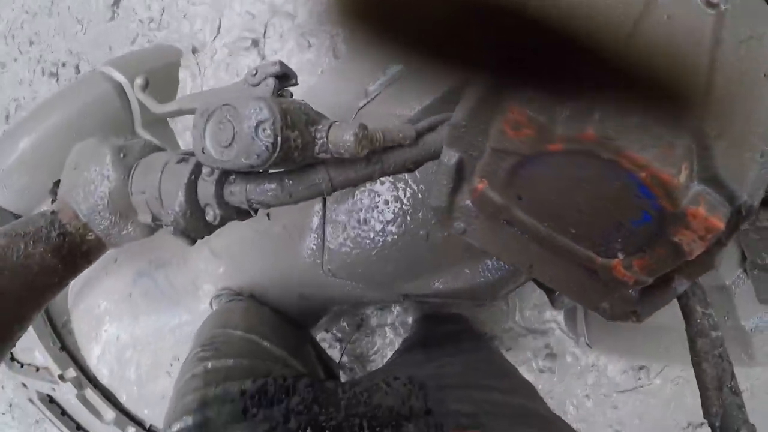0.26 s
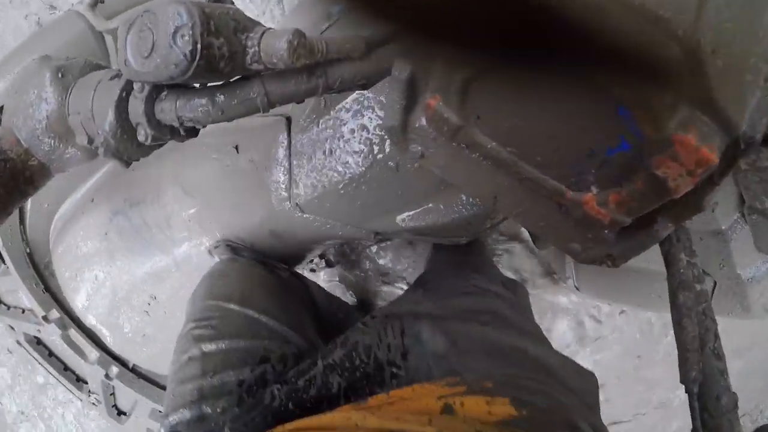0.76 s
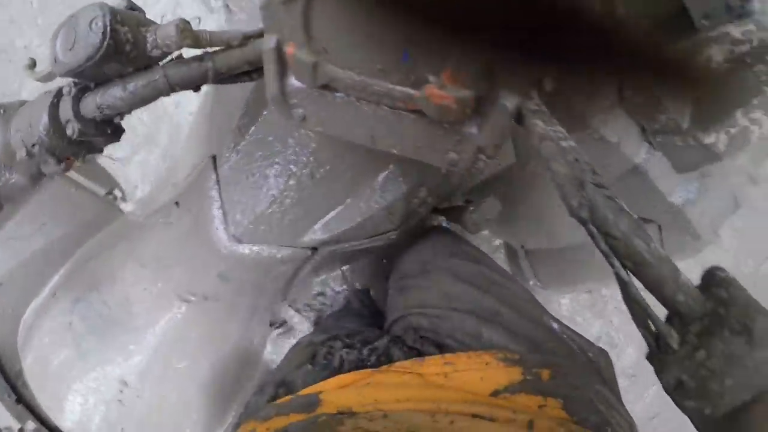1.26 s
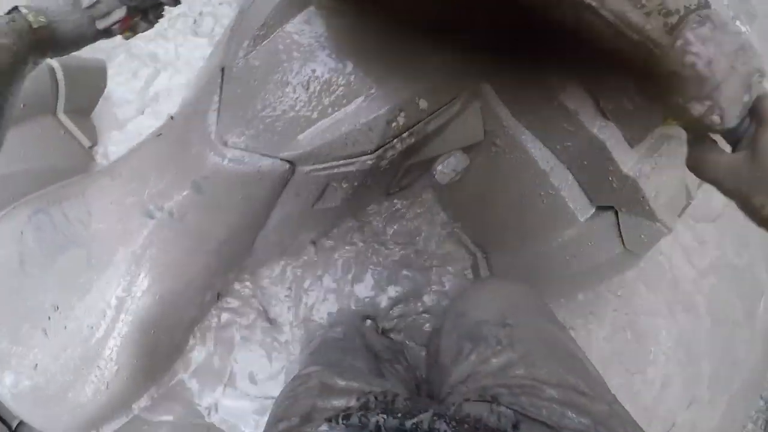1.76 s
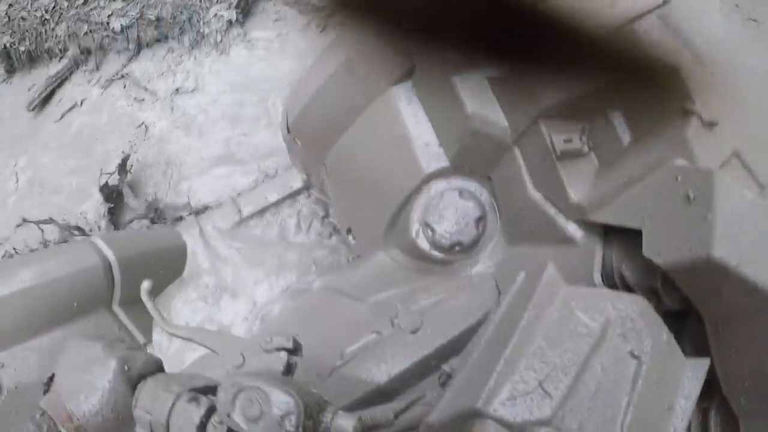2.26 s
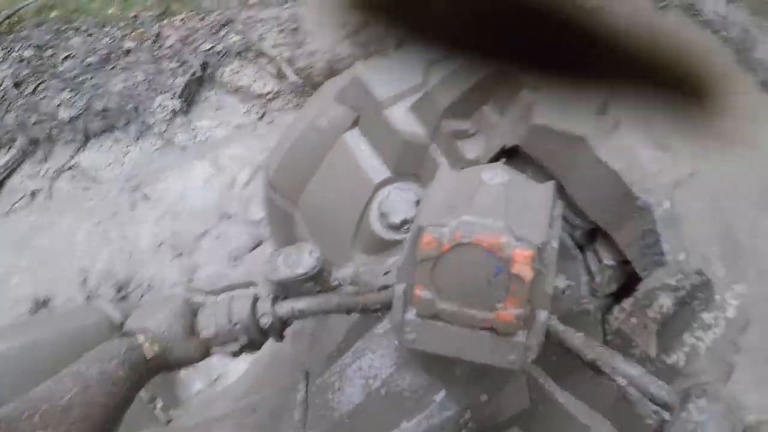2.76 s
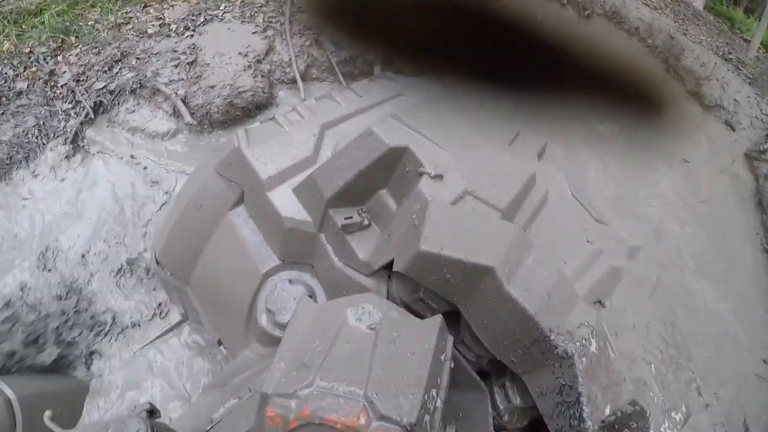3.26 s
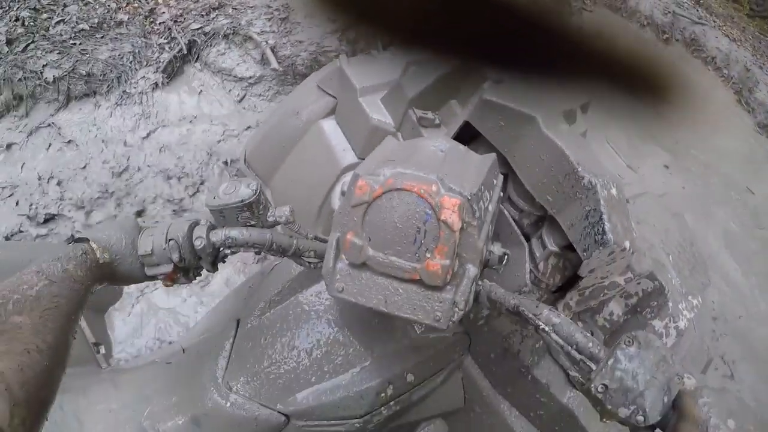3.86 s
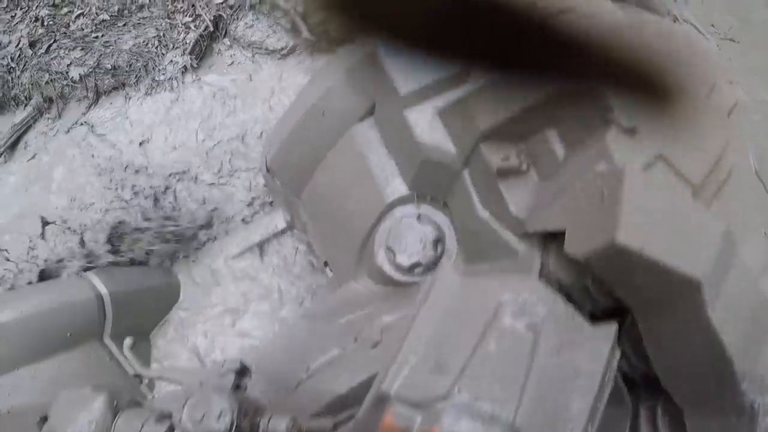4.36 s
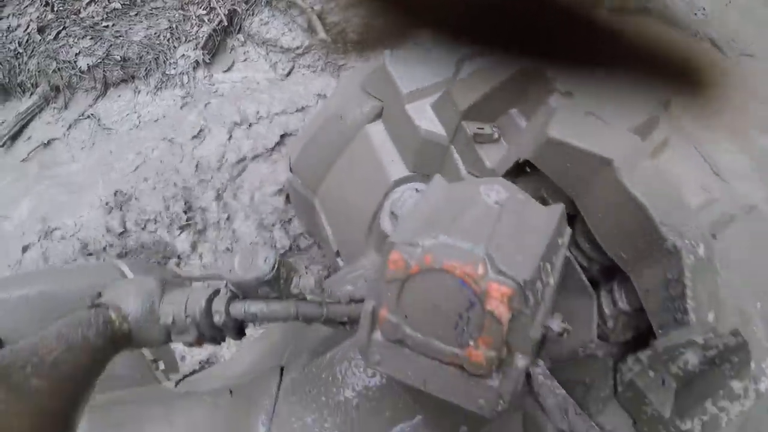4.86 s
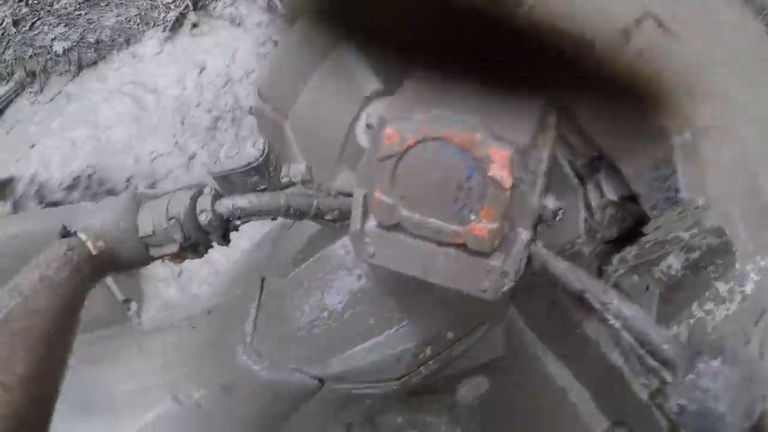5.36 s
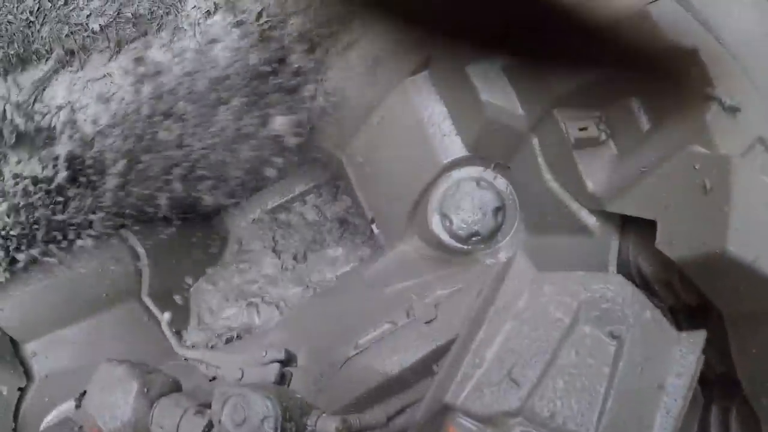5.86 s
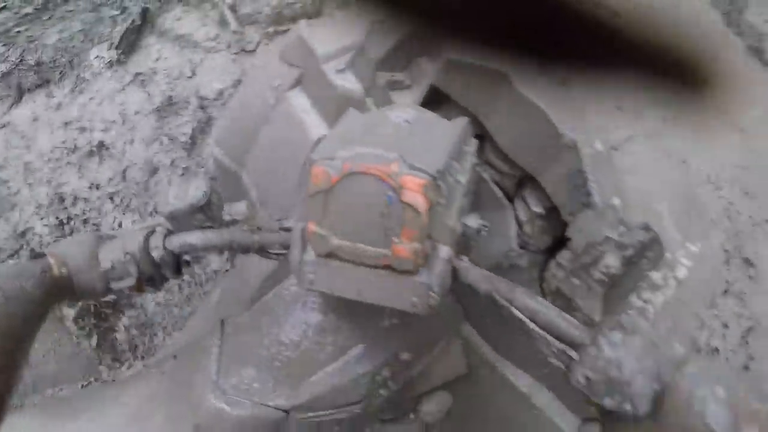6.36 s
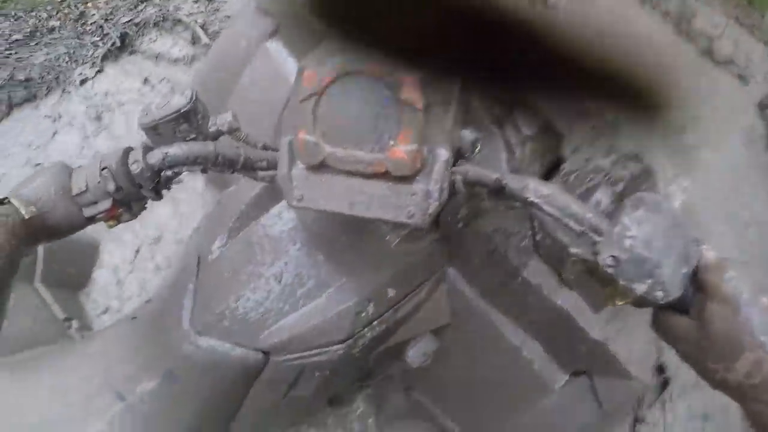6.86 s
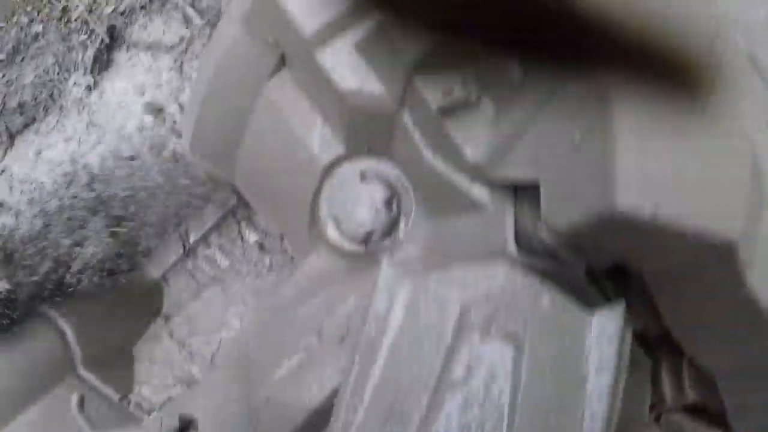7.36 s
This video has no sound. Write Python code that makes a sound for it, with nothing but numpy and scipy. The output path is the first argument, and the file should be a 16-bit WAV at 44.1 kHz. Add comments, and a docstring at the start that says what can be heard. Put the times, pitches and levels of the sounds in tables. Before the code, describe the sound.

Close up, a lumpy twin-cylinder engine glugs and sloshes in thick muddy water before five honking throttle blasts, each followed by spattering mud.

```python
"""Quad bike stuck in a mud hole

A V-twin ATV idles deep in mud, heard from the rider's helmet, then gets five bursts of throttle.
Harmonics and firing pulses follow one crank speed: they drive the pipe's throb, the drowned exhaust,
the drumming bodywork and the intake's honk. Filtered noise and random impacts make sloshing water,
and mud that comes down heaviest after each burst. Glugs, plops, knocks and ticks are placed singly."""
import sys
import numpy as np
from scipy import signal
from scipy.fft import rfft, irfft
from scipy.io import wavfile
from scipy.ndimage import uniform_filter1d, minimum_filter1d

SR = 44100
rng = np.random.default_rng(int(sys.argv[2]) if len(sys.argv) > 2 else 0)


def transcribe(signal):
    """Save signal, clipped to [-1, 1], as a 16-bit WAV file at the path in sys.argv[1]."""
    frames = np.atleast_2d(signal).T
    limited = np.clip(frames, -1, 1)
    pcm = np.round(limited * 32767).astype(np.int16)
    wavfile.write(sys.argv[1], SR, pcm)


N = 336042
TIME = np.arange(N) / SR

# Bursts of throttle. Each row: half open on the way up in seconds, half shut in seconds, starting rpm,
# run-up in rpm per second, top rpm under that load, honk in dB at HONK_RPM,
# amount of thrown mud in dB, delay from shutting to the mud's peak in seconds.
BURSTS = [ (1.70, 2.101, 1573, 6420, 7180, -11, -44, 0.96),
          (2.703, 3.201, 1845, 6660, 7164, -10.5, -37, .52),
          (3.807, 4.247, 1816, 6810, 5957, -9, -37.5, .59),
          (4.939, 5.617, 1959, 7635, 5926, -10.5, -35, 0.78),
          (6.575, 7.361, 1789, 7148, 6190, -11.5, -41, 0.54), ]
# Idle that sags, then creeps up before the first burst. Each row: time in seconds, speed in rpm.
IDLE_SPEED = [(0, 1206), (.4, 1171), (1.17, 1239), (1.58, 1294), (1.70, 1510)]
# Harmonics of the engine's note. Each row: multiple of the cycle rate, level in dB.
NOTE_HARMONICS = [(1, -1), (2, 5), (3, 9.5), (4, 3.5), (5, -4.5), (6, 5.5), (7, 3), (8, 1.5), (9, 3),
                  (10, 1.5), (11, 2.5), (12, 3), (13, -1.5), (14, 6.5), (15, 0.5), (30, -2), (48, -5.5)]
# Harmonics of the pipe's throb. Each row: multiple of the cycle rate, level in dB.
THROB_HARMONICS = [(1, -9.5), (2, -2), (3, -13.5)]
# Tailpipe under water. Each row: frequency in Hz, response in dB.
TAILPIPE_RESPONSE = [(20, -2.5), (55, -8), (80, 0.5), (100, 5), (125, -7.5), (200, -16.5), (400, -51),
                     (1000, -103.5)]
# Air gurgling in the flooded bodywork. Each row: time in seconds, level in dB before the pipe clears.
GURGLE_LEVEL = [(0, -25.5), (1.1, -18.5), (1.4, -14.5), (2.0, -11), (2.4, -89)]
# Colour of that gurgle. Each row: frequency in Hz, response in dB.
GURGLE_RESPONSE = [(60, -10.5), (103, 12.5), (135, -10), (180, 8.5), (220, -1), (280, -25.5), (500, -46),
                   (1000, -85.5)]
# Engine case and bodywork. Each row: frequency in Hz, response in dB.
BODY_RESPONSE = [(40, -12), (110, -7), (165, 0), (215, -2.5), (270, -6), (420, -7.5), (520, -15.5),
                 (630, -26.5), (800, -34.5), (1050, -42.5), (2000, -38.5), (5000, -107)]
# Trim on the rumble, lowest in and after the first burst. Each row: time in seconds, added level in dB.
RUMBLE_TRIM = [(1.45, -5.5), (1.7, -4.5), (2.25, -13), (2.52, -13), (2.7, -8.5), (3.3, -6), (4.6, -7),
               (6.2, -6), (7.5, -8)]
# Water round the engine. Each row: time in seconds, slop in dB, brighter splash in dB.
WASH_LEVELS = [(0, -31.5, -39), (.3, -29.5, -45), (.52, -30, -44), (.7, -27.5, -43), (1.05, -28, -38.5),
               (1.28, -31, -42), (1.5, -32.5, -46.5), (2.4, -45, -56.5), (4, -67, -95)]
# Colour of the slop. Each row: frequency in Hz, response in dB.
SLOP_RESPONSE = [(250, 18.5), (600, 14.5), (800, 11), (1080, 2.5), (1400, 4), (1700, -4.5), (2000, -6),
                 (2600, -8.5), (3400, -6), (4300, -18.5), (6000, -30.5), (8000, -23), (11000, -34)]
# Colour of the splash. Each row: frequency in Hz, response in dB.
SPLASH_RESPONSE = [(500, -19.5), (1000, -8.5), (1450, 11), (1750, 0.5), (2050, 0.5), (2600, 1), (3400, -1),
                   (4400, -15.5), (7000, -25), (12000, -38.5)]
# Rings of the engine case. Each row: frequency in Hz, width in Hz, height in dB.
CASE_RINGS = [(1933, 29, 11), (1880, 18, 5.7)]
# Fizz of stirred water. Each row: time in seconds, level in dB.
FIZZ_LEVEL = [(0, -65), (1.4, -67), (1.72, -53.5), (2.02, -67.5), (2.11, -79), (2.15, -56.5), (2.7, -76.5),
              (3.2, -100)]
# Colour of the fizz. Each row: frequency in Hz, response in dB.
FIZZ_RESPONSE = [(3000, -29.5), (6000, -5), (7700, -5), (9000, -11), (12000, -29.5)]
# Mud hitting the fenders. Each row: frequency in Hz, response in dB.
PATTER_RESPONSE = [(60, 1.5), (200, 19.5), (420, 22), (650, 16.5), (1050, -6.5), (1300, 4.5), (1550, 7),
                   (2100, 4.5), (2450, 4.5), (3450, -9.5), (4300, -8), (5200, -10.5), (6400, -13),
                   (8000, -16.5), (9800, -23), (11200, -30.5), (15000, -45.5)]
# Fender rings and hollows. Each row: frequency in Hz, width in Hz, height in dB.
FENDER_MODES = [(1512, 45, 8), (1716, 140, -26.5), (2067, 230, -22), (3476, 340, 14), (3716, 150, -14.5),
                (4250, 220, 6), (4600, 270, -3.5), (5140, 170, 7), (5790, 480, -2), (6320, 270, 5.5),
                (6550, 300, 0.5)]
# Colour of the mist. Each row: frequency in Hz, response in dB.
MIST_RESPONSE = [(3000, -35), (8000, -10.5), (9800, -12.5), (11200, -16), (12300, -1.5), (14500, 0.5),
                 (15500, -12.5)]
# Plops and splats. Each row: start in seconds, peak in dB, pitch in Hz, splat relative to the bubble's ring.
PLOP_EVENTS = [(.1186, -34, 3550, 0.35), (0.527, -24, 1570, 3), (.82, -21.5, 1400, 0.14),
               (0.821, -27, 3210, 0.54), (.884, -28, 2620, 2.1), (0.893, -31, 2980, 3),
               (0.901, -31, 2720, 3), (1.6449, -17.5, 3340, 0.26), (3.1139, -40, 1675, 3.6),
               (3.5529, -33, 2302, 2.72), (4.3666, -30.5, 2777, 3), (4.8971, -30, 1600, 3.14)]
# Knocks of a hard part. Each row: start in seconds, peak in dB.
KNOCK_EVENTS = [(.1335, -18), (.138, -26), (.1405, -21), (.153, -13.5), (.1575, -27)]
# What that part rings with. Each row: frequency in Hz, decay in seconds, relative level in dB.
KNOCK_RINGS = [(1150, 0.0018, -3), (1350, 0.0025, 14), (1950, .0016, -5), (3530, .001, -20)]
# Big air pockets from the tailpipe. Each row: start in seconds, peak in dB, mid pitch in Hz, length in seconds.
GLUG_EVENTS = [(0.146, -16, 101.2, 0.14), (.40, -12.5, 96.9, 0.19), (0.916, -11, 78.3, 0.11),
               (1.035, -13, 71, .1), (1.329, -11.5, 95.2, 0.097), (1.462, -14, 104, 0.056),
               (1.64, -12.5, 106, 0.13), (2.121, -10.5, 84.35, 0.088), (2.176, -13, 112, 0.078),
               (2.319, -18, 96.8, 0.15), (3.549, -11.5, 96.2, 0.15), (4.832, -18, 95.6, 0.084),
               (5.896, -13.5, 86.1, 0.16), (6.032, -14, 92.5, 0.14), (6.191, -11, 102.6, 0.086),
               (6.246, -15, 91, .09), (6.42, -17, 92, .1)]
# Sharp ticks. Each row: start in seconds, peak in dB, centre of the band in Hz.
TICK_EVENTS = [(1.646, -32, 4500), (2.451, -35, 3300), (2.808, -38, 5000), (3.554, -31, 4200),
               (4.368, -34, 4500), (5.227, -35, 1500), (5.408, -24, 1400), (5.497, -29, 1500)]
# Airbox and snorkel answering a gulp of air. Each row: frequency in Hz, response in dB.
AIRBOX_RESPONSE = [(15, -51), (35, -2.5), (70, -12.5), (100, -12.5), (143, -2), (172, -12.5), (205, 4.5),
                   (235, 5), (260, 1.5), (298, -16), (345, -5), (390, 2.5), (440, -3), (485, -19.5),
                   (540, -17), (680, -48.5), (1100, -55), (2500, -93.5)]
# Opening out to both sides. Each row: time in seconds, gain of the side signal in dB.
SIDE_LEVEL = [(1.0, -32.5), (1.6, 8.5), (2.0, 10.5), (2.4, 4.5), (2.8, -10.5), (3.2, -40)]
# Colour of the side signal. Each row: frequency in Hz, response in dB.
SIDE_RESPONSE = [(40, -54), (200, -29), (420, -21), (1100, 6.5), (2000, -8.5), (3500, -19), (8000, -4.5)]

SECOND_FIRING = .395  # share of the cycle from the first cylinder's firing to the second's
OPEN_RAMP_S, SHUT_RAMP_S = 0.11, .06  # time the throttle takes to move
TOP_KNEE = 9  # sharpness of the levelling off towards the top speed
COAST_SHAPE = 1.8  # the crank runs down quickly at first
LAST_COAST_S, LAST_COAST_RPM = 1, 1706  # the last coast heads for this speed over this time
NOTE_WAVER_DB = 2  # the balance of the harmonics keeps shifting
# throb levels well below the fade speeds, with the throttle shut and open
THROB_SHUT_DB, THROB_SHUT_FADE_RPM = -14.5, 2430
THROB_OPEN_DB, THROB_OPEN_FADE_RPM = -13, 4600
CLEAR_RPM = 3800  # at this speed the open throttle halves the burble, gurgle and rumble
# levels before that clearing; the bubbles come in uneven gushes
BURBLE_DB, BURBLE_SURGE_DB = -18.5, 5.5
PIPE_SWING_OCTAVES = .1  # shift of the tailpipe's pitch either way with its depth
RUMBLE_SHUT_DB, RUMBLE_OPEN_DB = -13.5, -2  # before the clearing and RUMBLE_TRIM
RUMBLE_BAND_HZ = 360  # the churning is scaled to match the engine's note within about this band
SPRAY_LEAD_S, SPRAY_FALL_S, SPRAY_SHAPE = 0.3, 0.53, 0.96  # mud starts to fly before the throttle shuts
DRIBBLE_DB = -49.5  # mud that always runs off the wheels
PATTER_DB = 5.5  # thud and patter on the fenders for a given amount of mud
MIST_DB, MIST_ONSET_DB, MIST_GROWTH = -72, -44, 1.2  # mist at that much mud; it grows faster than the mud
GLUG_SAG = 0.15  # fall over a whole glug, as a share of its mid pitch
TICK_DECAY_S = .0007
HONK_RPM, HONK_DB_PER_OCTAVE = 3000, 5  # the honk has its listed level at this speed and grows above it
HONK_ROUGH, HONK_CLEAN_RPM = 1.5, 2900  # turbulence relative to the tone at low revs; halved at this speed
TOP_HZ = 15300


def undb(db):
    """Decibels to gain."""
    return 10 ** (np.asarray(db) / 20)


def curve(rows, axis=1):
    """One column of a table, joined by straight lines in time."""
    rows = np.asarray(rows)
    return np.interp(TIME, rows[:, 0], rows[:, axis])


def steady(x, size=7001):
    """Hold the running rms near 1."""
    power = uniform_filter1d(uniform_filter1d(x * x, size), size)
    return x / np.sqrt(np.abs(power) + 1e-18)


def colour(x, points, size=16384):
    """Causal minimum-phase filter with the given (Hz, dB) response."""
    hz, db = np.transpose(points)
    grid = np.maximum(np.fft.rfftfreq(size, 1 / SR), 1)
    response_db = np.interp(np.log(grid), np.log(hz), db)
    # folding the cepstrum onto positive times makes the filter causal
    cepstrum = irfft(np.log(undb(response_db)))
    cepstrum[1:size // 2] *= 2
    cepstrum[size // 2 + 1:] = 0
    impulse = irfft(np.exp(rfft(cepstrum)))
    return signal.fftconvolve(x, impulse)[:N]


def resonate(x, modes):
    """Narrow peaks and dips, added one after another."""
    for hz, width, db in modes:
        band = signal.lfilter(*signal.iirpeak(hz, hz / width, fs=SR), x)
        x = x + (undb(db) - 1) * band
    return x


def band_noise(noise, order, low_hz, high_hz):
    """Noise kept between two frequencies."""
    return signal.sosfilt(signal.butter(order, [low_hz, high_hz], "band", fs=SR, output="sos"), noise)


def clicks(times, sizes):
    """Impulses, each shared between two samples."""
    at = np.clip(times * SR, 0, N - 2)
    i = at.astype(int)
    late = at - i
    return np.bincount(i, sizes * (1 - late), N) + np.bincount(i + 1, sizes * late, N)


def walk(rate):
    """Random wavering with a spread near 1, from this many points a second."""
    return np.interp(TIME * rate, np.arange(4096), rng.standard_normal(4096))


def drops(rate, spread_db):
    """Random impacts of either sign at this rate per second, their sizes scattered by spread_db."""
    hit = rng.random(N) < rate / SR
    sizes = undb(spread_db * np.minimum(rng.exponential(size=N), 6))
    x = hit * sizes * rng.choice([-1, 1], N)
    return x / np.std(x)


def ring(x, decay_s, size=8192):
    """A dense tail from many short reflections."""
    t = np.arange(size) / SR
    tail = rng.standard_normal(size) * np.exp(-t / decay_s)
    # even out its colour, so that it mostly just smears time
    response = rfft(tail, 2 * size)
    smear = irfft(response / np.abs(response))[:size]
    return signal.fftconvolve(x, smear)[:N]


def spread(mid, side, side_db):
    """Left and right from a common and an opposed part."""
    return mid + undb(side_db) * side * np.array([[1], [-1]])


def opening(opens, shuts):
    """Throttle during one burst, 0 to 1: ramp up, hold, snap shut."""
    rising = (TIME - opens) / OPEN_RAMP_S
    falling = (shuts - TIME) / SHUT_RAMP_S
    return np.clip(np.minimum(rising, falling) + .5, 0, 1)


def crank_speed():
    """Rpm: a drifting idle, then for each burst a run-up that levels off and a coast down."""
    rpm = curve(IDLE_SPEED)
    coast_ends = [(opens, start) for opens, _, start, *_ in BURSTS[1:]]
    coast_ends.append((BURSTS[-1][1] + LAST_COAST_S, LAST_COAST_RPM))
    for (opens, shuts, start, run_up, top, *_), (ends, low) in zip(BURSTS, coast_ends):
        free = start + run_up * np.clip(TIME - opens, 0, shuts - opens)
        driven = free / (1 + (free / top) ** TOP_KNEE) ** (1 / TOP_KNEE)
        coast = np.interp(TIME, [shuts, ends], [1, 0]) ** COAST_SHAPE
        rpm = np.where(TIME > opens, low + (driven - low) * coast, rpm)
    return rpm


def engine_note(cycles):
    """Wavering harmonics that glide with the crank, phased like two unevenly spaced gas pulses a cycle."""
    phase = cycles + .003 * walk(45)
    orders = np.arange(1, NOTE_HARMONICS[-1][0] + 1)
    levels = np.interp(orders, *np.transpose(NOTE_HARMONICS))
    shifts = np.angle(1 + .9 * np.exp(-2j * np.pi * orders * SECOND_FIRING))
    note = np.zeros(N)
    for order, db, shift in zip(orders, levels, shifts):
        strength = undb(db + NOTE_WAVER_DB * walk(7))
        note += strength * np.cos(2 * np.pi * order * phase + shift)
    return steady(note)


def firings(cycles, jitter_s, scatter_db):
    """Two unevenly spaced pulses for every two turns of the crank, scattered in time and strength."""
    chance = rng.standard_normal((1024, 2))
    count = np.arange(2 * int(cycles[-1]))
    times = np.interp(count // 2 + SECOND_FIRING * (count % 2), cycles, TIME)
    return clicks(times + jitter_s * chance[count, 0], undb(scatter_db * chance[count, 1]))


def puffs(pulses, decay_s):
    """A short gust of turbulence after each pulse."""
    gusts = signal.lfilter([1], [1, -np.exp(-1 / (decay_s * SR))], pulses)
    return steady(gusts * rng.standard_normal(N))


def throb(cycles, rpm, throttle):
    """The pipe throbs mainly once a crank turn: strong at idle and when pulling, fading as the speed rises."""
    phase = cycles + .02 * walk(28)
    wave = np.sqrt(2) * sum(undb(db) * np.sin(2 * np.pi * k * phase) for k, db in THROB_HARMONICS)
    coasting = undb(THROB_SHUT_DB) / (1 + (rpm / THROB_SHUT_FADE_RPM) ** 6)
    pulling = undb(THROB_OPEN_DB) / (1 + (rpm / THROB_OPEN_FADE_RPM) ** 6)
    return wave * ((1 - throttle) * coasting + throttle * pulling)


def exhaust(cycles):
    """Bubbles scattered round the firings burble in a pipe that dips and lifts, or gurgle in the bodywork."""
    pulses = firings(cycles, jitter_s=.003, scatter_db=2)
    bubbles = steady(ring(pulses, decay_s=.015)) + .6 * puffs(pulses, decay_s=.08)

    def pipe(octaves):
        """The bubbles through the tailpipe, its response shifted in pitch."""
        return colour(bubbles, [(hz * 2 ** octaves, db) for hz, db in TAILPIPE_RESPONSE])

    # blending a low and a high pipe stands for the changing depth
    depth = np.clip(.5 + .5 * walk(3.3), 0, 1)
    blend = depth * pipe(-PIPE_SWING_OCTAVES) + (1 - depth) * pipe(PIPE_SWING_OCTAVES)
    burble = steady(blend, size=2001) * undb(BURBLE_DB + BURBLE_SURGE_DB * walk(30))
    gurgle = steady(colour(bubbles, GURGLE_RESPONSE), size=2001) * undb(curve(GURGLE_LEVEL))
    return burble + gurgle


def rumble(cycles, throttle, note):
    """Engine note and churned water drum on case and bodywork: firm under load, ragged with throttle shut."""
    pulses = firings(cycles, jitter_s=.002, scatter_db=2)
    tone = ring(note, decay_s=.008) * (.6 + .4 * throttle)
    band_gain = np.sqrt(SR / 2 / RUMBLE_BAND_HZ)
    churn = puffs(pulses, decay_s=.09) * band_gain * (.7 - .45 * throttle)
    db = (1 - throttle) * RUMBLE_SHUT_DB + throttle * RUMBLE_OPEN_DB + curve(RUMBLE_TRIM)
    return steady(colour(tone + churn, BODY_RESPONSE), size=2001) * undb(db)


def wash():
    """Noise and impacts as water slopping round the idling engine, whose case rings; it fades in the bursts."""
    surge = undb(1.2 * walk(17.0) + 1.9 * walk(70))
    flow = drops(1800, spread_db=0.5) + 0.93 * rng.standard_normal(N)
    slop = steady(resonate(colour(flow, SLOP_RESPONSE), CASE_RINGS))
    splash = steady(resonate(colour(drops(2500, spread_db=1.5), SPLASH_RESPONSE), CASE_RINGS))
    # a thin fizz swells as the first burst stirs the water
    fizz = steady(colour(drops(2600, spread_db=3.5), FIZZ_RESPONSE))
    water = slop * undb(curve(WASH_LEVELS)) + splash * undb(curve(WASH_LEVELS, axis=2))
    return surge * (water + fizz * undb(curve(FIZZ_LEVEL)))


def thrown_mud():
    """Amount of mud coming down: each burst throws one fountain, which builds up and collapses."""
    power = undb(DRIBBLE_DB) ** 2
    for _, shuts, *_, db, lag in BURSTS:
        swell = np.interp(TIME - shuts, [-SPRAY_LEAD_S, lag, lag + SPRAY_FALL_S], [0, 1, 0])
        power = power + (undb(db) * swell ** SPRAY_SHAPE) ** 2
    return np.sqrt(power)


def spray():
    """Mud rains on the ringing fenders in uneven sheets, with a fine mist of impacts above it."""
    mud = thrown_mud()
    sheets = undb(1.0 * walk(22) + 0.91 * walk(90))
    impacts = drops(4000, spread_db=0.0) + .5 * rng.standard_normal(N)
    patter = steady(resonate(colour(impacts, PATTER_RESPONSE), FENDER_MODES))
    mist = [steady(colour(drops(5000, spread_db=-5.0), MIST_RESPONSE)) for _ in range(2)]
    # the mist is wide and leans to the right
    fine = spread(*mist, side_db=-3.5) * undb(MIST_DB + np.array([[-3], [3]]))
    mist_swell = (mud / undb(MIST_ONSET_DB)) ** MIST_GROWTH
    return sheets * (patter * mud * undb(PATTER_DB) + fine * mist_swell)


def plops(size=2048):
    """Thick bubbles burst: a few cycles rising slightly in pitch, and a wet splat of noise."""
    out, t = np.zeros(N + size), np.arange(size) / SR
    swell = t ** 2 * np.exp(-t / .0012)
    for s, db, hz, wet in PLOP_EVENTS:
        bubble = np.sin(2 * np.pi * hz * t * (1 + 2 * t))
        splat = band_noise(rng.standard_normal(size), 3, hz / 1.5, min(hz * 1.5, 4200))
        pop = (bubble + wet * splat / np.std(splat)) * swell
        start = int(s * SR)
        out[start:start + size] += undb(db) * pop / np.abs(pop).max()
    return out[:N]


def knocks(size=1024):
    """Short hard knocks, all on the same part ringing in a few damped modes."""
    t = np.arange(size) / SR
    blow = np.zeros(size)
    for hz, decay_s, db in KNOCK_RINGS:
        blow += undb(db) * np.exp(-t / decay_s) * np.sin(2 * np.pi * hz * t)
    times, db = np.transpose(KNOCK_EVENTS)
    return signal.fftconvolve(clicks(times, undb(db)), blow / np.abs(blow).max())[:N]


def glugs():
    """Each big air pocket swells, wobbles for a few cycles and dies away, sinking in pitch."""
    out, wobble = np.zeros(N), .13 * walk(45)
    for s, db, hz, length in GLUG_EVENTS:
        age = np.clip((TIME - s) / length, 0, 1)
        live = (age > 0) & (age < 1)
        age = age[live]
        turns = hz * length * (age + GLUG_SAG * age * (1 - age) / 2)
        wave = np.sin(2 * np.pi * (turns + wobble[live] + rng.random()))
        out[live] += undb(db) * np.sin(np.pi * age ** 0.85) * wave
    return out


def ticks(size=512):
    """Sharp dry ticks of decaying band noise."""
    out, t = np.zeros(N + size), np.arange(size) / SR
    for s, db, hz in TICK_EVENTS:
        burst = rng.standard_normal(size) * np.exp(-t / TICK_DECAY_S)
        tick = band_noise(burst, 2, hz / 1.7, hz * 1.7)
        start = int(s * SR)
        out[start:start + size] += undb(db) * tick / np.abs(tick).max()
    return out[:N]


def intake(cycles, rpm, note):
    """Under throttle, gulps of air ring the airbox and snorkel: ragged at low revs, clean and louder high up."""
    pulses = firings(cycles, jitter_s=.00006, scatter_db=1.0)
    rough = HONK_ROUGH / (1 + (rpm / HONK_CLEAN_RPM) ** 6)
    # the ducts draw each gulp out a little
    gulps = ring(note, decay_s=.003) + rough * puffs(pulses, decay_s=.035)
    honk = steady(colour(gulps, AIRBOX_RESPONSE), size=3001)
    effort = sum(opening(opens, shuts) * undb(db) for opens, shuts, _, _, _, db, *_ in BURSTS)
    return honk * effort * undb(HONK_DB_PER_OCTAVE * np.log2(rpm / HONK_RPM))


def scene():
    """All layers from one crank: the engine in the middle, and a mix that opens out briefly to both sides."""
    rpm = crank_speed()
    throttle = sum(opening(opens, shuts) for opens, shuts, *_ in BURSTS)
    cycles = np.cumsum(rpm / (2 * 60)) / SR  # one cycle is two crank turns
    note = engine_note(cycles)
    # under load the gas blows the pipe clear: bubbling and rumble thin out
    clear = 1 / (1 + throttle * (rpm / CLEAR_RPM) ** 3)
    drowned = clear * (exhaust(cycles) + rumble(cycles, throttle, note))
    engine = throb(cycles, rpm, throttle) + drowned + intake(cycles, rpm, note)
    sound = engine + wash() + spray() + plops() + knocks() + glugs() + ticks()
    side = colour(ring(sound.mean(axis=0), decay_s=0.00076), SIDE_RESPONSE)
    return spread(sound, side, curve(SIDE_LEVEL))


def record(dry):
    """Cut the lowest rumble, hold the peaks with a look-ahead limiter, then cut the top."""
    sound = signal.sosfilt(signal.butter(2, 12, "high", fs=SR, output="sos"), dry)
    ceiling = .94
    needed = ceiling / np.maximum(np.abs(sound).max(axis=0), ceiling)
    # the gain drops ahead of each peak and is smoothed twice
    held = minimum_filter1d(needed, size=881)
    gain = uniform_filter1d(uniform_filter1d(held, size=441), size=441)
    return signal.sosfilt(signal.ellip(8, .2, 70, TOP_HZ, fs=SR, output="sos"), sound * gain)


dry = scene()
out = record(dry)
transcribe(out)
```